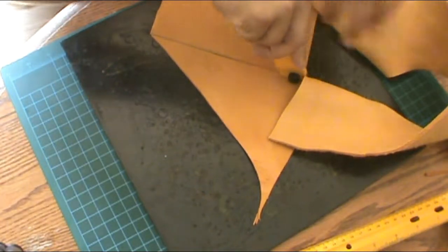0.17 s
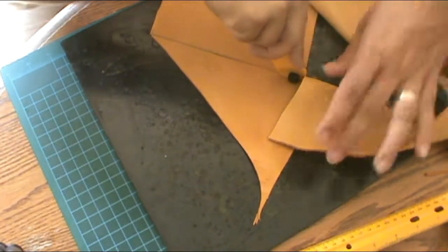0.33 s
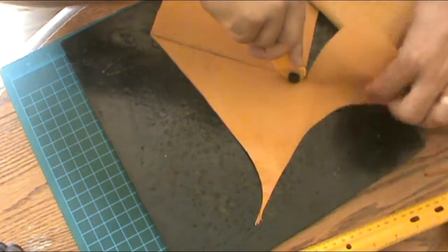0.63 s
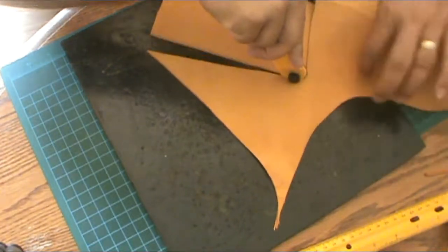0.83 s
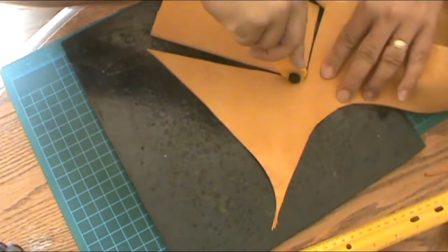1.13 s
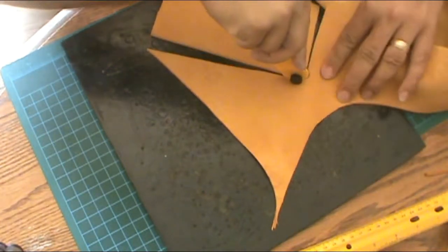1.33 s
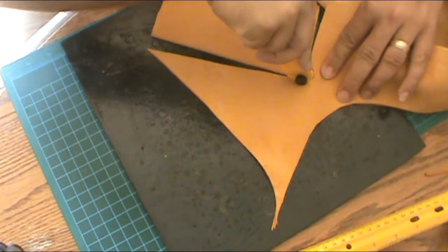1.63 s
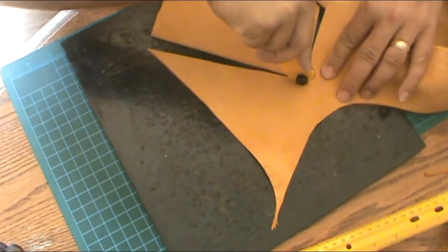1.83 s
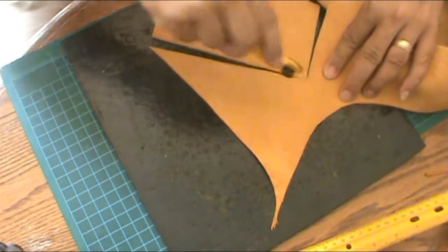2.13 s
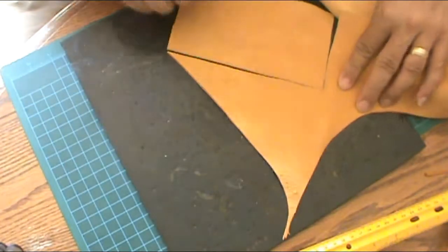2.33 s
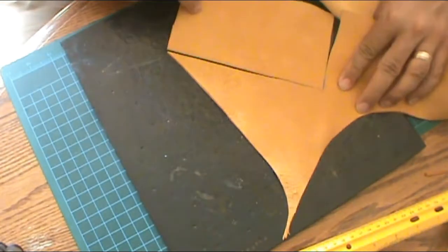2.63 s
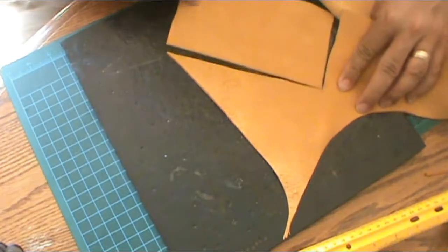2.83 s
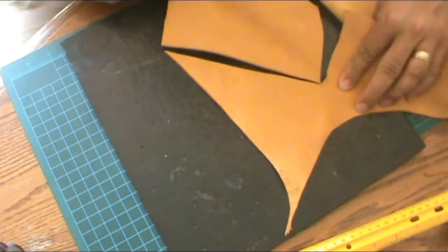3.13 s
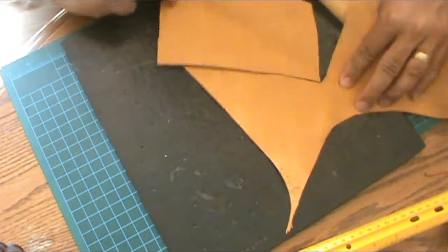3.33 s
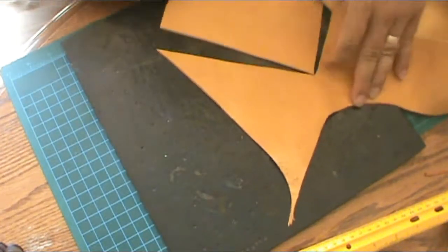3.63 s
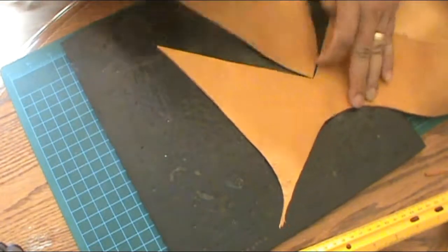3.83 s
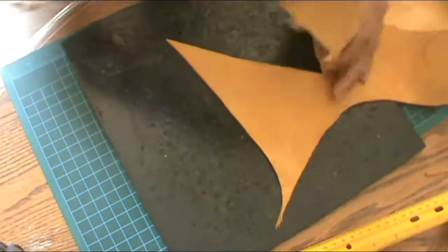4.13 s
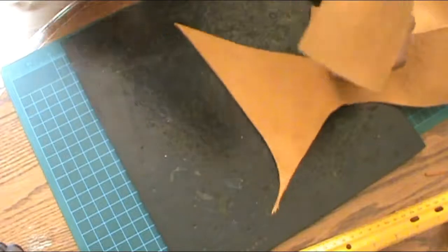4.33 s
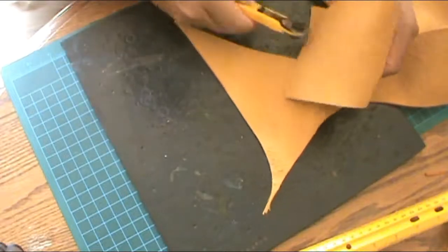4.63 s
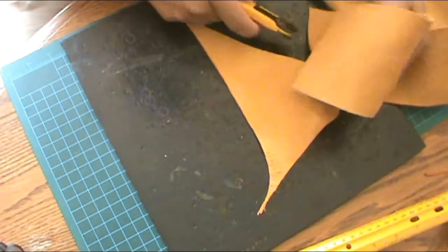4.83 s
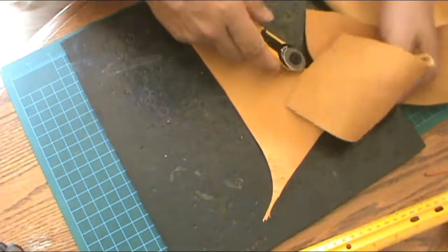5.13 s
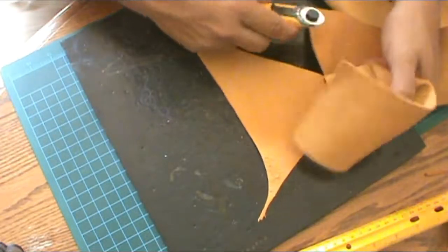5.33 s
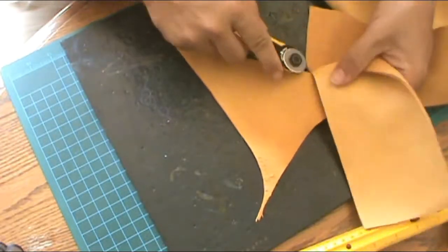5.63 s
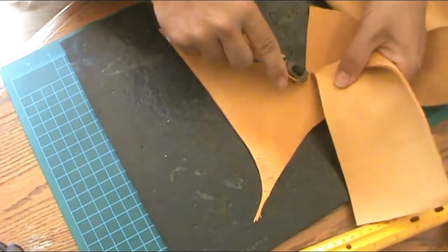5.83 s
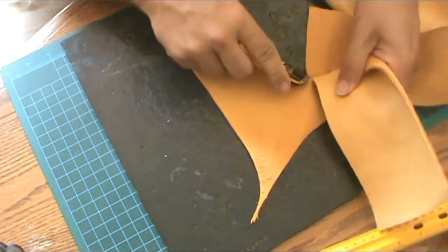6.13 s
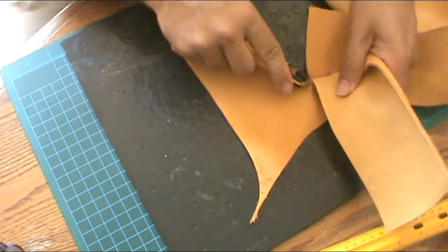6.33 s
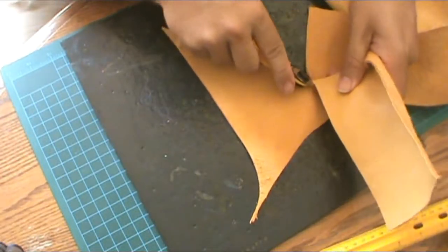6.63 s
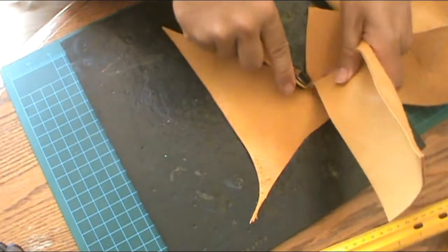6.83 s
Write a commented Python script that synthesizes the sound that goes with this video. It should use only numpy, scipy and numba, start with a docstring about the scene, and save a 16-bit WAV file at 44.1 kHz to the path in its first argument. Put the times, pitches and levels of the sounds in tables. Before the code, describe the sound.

A fan drones with a low, slightly throbbing hum throughout, in a small room. A faint crunch of a rotary cutter in leather comes at the start. From about 0.6 seconds the hide drags jerkily across a rubber board, running into a cluster of table thumps and a clack with a small steel clink between 0.8 and 1 second. Three soft, short cutting crunches follow from 1.3 to 1.7 seconds, then a few dry clicks around 2.1. At about 2.5 seconds the cutter scrapes lightly and knocks several times on the board. From 2.8 to 5.8 seconds the leather slides and rustles quietly under the hands in uneven strokes, with scattered small ticks. At 6 seconds the plastic blade guard snaps open, the loudest sound, with a brief steel ring and room echo. Only the fan remains until the end, near 7 seconds.

```python
"""In a small room where a fan drones, leather is cut with a rotary cutter on a rubber board.
The round blade crunches through the fibres, the hide grips and slips as it is shoved aside,
the cutter knocks on the table, and pieces slide and rustle under the hands.
At last the plastic blade guard snaps open, loud enough to ring the room."""
import sys
import numpy as np
from scipy import signal
from scipy.fft import rfft, irfft
from scipy.io import wavfile
from scipy.ndimage import uniform_filter1d
from numba import njit

SR = 44100
rng = np.random.default_rng(int(sys.argv[2]) if len(sys.argv) > 2 else 0)


def int16_out(signal):
    """Quantize to a 16-bit WAV file."""
    q = np.round(np.clip(np.atleast_2d(signal).T, -1, 1) * 32767)
    wavfile.write(sys.argv[1], SR, q.astype(np.int16))


N = 307377
T = np.arange(N) / SR
SIDES = np.array([[1], [-1]])  # plus on the left, minus on the right
TOP_HZ = 15750


def undb(db):
    """Turn decibels into a volume factor."""
    return 10 ** (np.asarray(db) / 20)


def unit(x):
    """Scale a signal to an average power of 1."""
    return x / np.sqrt(np.mean(x ** 2))


def on_log_axis(hz, points):
    """Read between (Hz, value) points, giving each octave equal space."""
    f, value = np.transpose(points)
    return np.interp(np.log(hz + 1), np.log(f), value)


def ring(x, response):
    """Make x ring like an object whose answer to one tap is `response`."""
    return signal.oaconvolve(x, response / np.linalg.norm(response))[:len(x)]


def colour(x, points):
    """Shape the tone along (Hz, dB) points; white noise keeps its power."""
    size = 8192
    hz = np.arange(size // 2 + 1) * SR / size + 1
    octaves_out = np.maximum(np.log2(points[0][0] / hz), 0) + np.maximum(np.log2(hz / points[-1][0]), 0)
    gain = undb(on_log_axis(hz, points) - 20 * np.minimum(octaves_out, 2))
    cepstrum = irfft(np.log(gain))
    cepstrum[1:size // 2] *= 2  # folded so that nothing sounds before its cause
    cepstrum[size // 2 + 1:] = 0
    return ring(x, irfft(np.exp(rfft(cepstrum))))


def modes(table):
    """A tapped object's few ringing tones; a fade time (t60) is the time to drop 60 dB."""
    t = T[:SR // 2]
    return sum(undb(db - 60 * t / t60) * np.sin(2 * np.pi * hz * t) for hz, db, t60 in table)


def crowd(t60, points):
    """A tapped object's many close tones, all dying quickly."""
    t = T[:SR // 4]
    fade = undb(-60 * t / t60)
    spectrum = rfft(rng.standard_normal(len(t)) * fade)
    even = irfft(spectrum / np.abs(spectrum), len(t))
    return colour(even * fade ** (1 / 4), points)


def blows(table, column):
    """One sharp tap per row, sized by a dB column."""
    x = np.zeros(N)
    for row in table:
        x[int(row[0] * SR)] += undb(row[column])
    return x


def struck(table, column, t60, points):
    """Every blow lands a little differently, so each gets its own mix of tones."""
    x = np.zeros(N + SR)
    for row in table:
        start, response = int(row[0] * SR), crowd(t60, points)
        x[start:start + len(response)] += undb(row[column]) * response / np.linalg.norm(response)
    return x[:N]


def curve(table):
    """Volume that follows (seconds, dB) points and fades beyond the ends."""
    times, db = np.transpose(table)
    outside = np.maximum(times[0] - T, 0) + np.maximum(T - times[-1], 0)
    return undb(np.interp(T, times, db)) * np.exp(-outside / 0.061)


def walk(rate):
    """A random wobble of size about 1 that turns `rate` times a second."""
    hold = int(SR / rate)
    steps = np.repeat(rng.standard_normal(N // hold + 1), hold)
    return unit(uniform_filter1d(steps, hold)[:N])


def slips(rate, spread_db):
    """Friction: about `rate` tiny random slips a second."""
    size = undb(spread_db * np.minimum(rng.standard_exponential(N), 4))
    return unit((rng.random(N) < rate / SR) * size * rng.choice([-1, 1], N))


@njit
def moving_band(x, hz, share):
    """Keep a band around a moving pitch; its width is a share of that pitch."""
    y, band, low = np.empty(len(x)), 0., 0.
    for i in range(len(x)):
        g = np.tan(np.pi * hz[i] / SR)
        v = (band + g * (x[i] - low)) / (1 + g * (g + share))
        band, low, y[i] = 2 * v - band, low + 2 * g * v, share * v
    return y


# The room's echo. Each row: pitch in Hz, base fade time in seconds.
ECHO_FADE = [(200, 0.4), (1000, 0.61), (4000, 0.47), (8000, 0.46), (14000, 0.34)]
# The echo's left-right difference. Each row: pitch in Hz, level in dB.
ECHO_WIDTH = [(200, -8), (600, 1), (1500, -3.5), (4400, -19), (8000, 2), (14000, 1.5)]
def room(x, wet_db, width, t60_scale):
    """The direct sound plus a wash of echo that lasts longest at middle pitches."""
    t = T[:SR * 3 // 4]
    hz = np.arange(len(t) // 2 + 1) * SR / len(t)
    noise, tail = rfft(rng.standard_normal((2, len(t)))), 0
    for band_hz, t60 in ECHO_FADE:
        share = on_log_axis(hz, [(f, f == band_hz) for f, _ in ECHO_FADE])
        tail = tail + irfft(noise * share, len(t)) * undb(-60 * t / (t60 * t60_scale))
    mid, side = tail * np.minimum(t / 0.0026, 1)
    return x + undb(wet_db) * (ring(x, mid) + width * SIDES * ring(x, colour(side, ECHO_WIDTH)))


# Late echoes. Each row: delay in seconds, smear in seconds, level in dB.
WALL_ECHOES = [(0.0535, 0.0062, -9.5), (0.092, 0.013, -16)]
# Their tone. Each row: pitch in Hz, level in dB.
WALL_TONE = [(300, 10), (750, 4), (1400, 2.5), (3000, 2), (6000, 1.5), (14000, -2.5)]
def far_walls(x):
    """The walls send the sound back late, dulled and scattered."""
    t, dulled = T[:SR // 6], colour(x, WALL_TONE)
    return sum(undb(db) * ring(dulled, rng.standard_normal(len(t)) * np.exp(-((t - delay) / smear) ** 2))
               for delay, smear, db in WALL_ECHOES)


# Microphone hiss and room air. Each row: pitch in Hz, level in dB.
MIC_TONE = [(300, -7), (2500, -0.5), (7500, -3), (11000, -1), (14000, -2.5), (16000, -2)]
ROOM_AIR_TONE = [(18, -66), (30, -28), (139, -20), (180, -6), (247, -13.5), (472, -6), (524, -11),
                 (794, -6), (859, -6.5), (1170, -11), (7830, -27), (15000, -39)]
def background():
    """Steady microphone hiss, and room air that differs between left and right."""
    hiss = undb(-61) * colour(rng.standard_normal(N), MIC_TONE)
    return hiss + undb(-56) * SIDES * colour(rng.standard_normal(N), ROOM_AIR_TONE)


# Air rumbling in the duct. Each row: pitch in Hz, width in Hz, level in dB.
DUCT_RUMBLE = [(146.9, 5, -53.5), (171.6, 17.6, -48), (186.4, 10, -51.5), (412.6, 39, -54.5)]
# Fan, motor and mains hum. Each row: pitch in Hz, level in dB, phase wobble in radians.
HUMS = [(118.4, -59, .2), (172.5, -42.5, 0.57), (187.8, -48, 0.68), (215, -63, 0.15), (237.4, -59, 0.53),
        (360.6, -62, .2), (531, -67.5, 0.16), (840.6, -65.5, 0.089), (1937, -78, 0.47)]
# Rushing air. Each row: pitch in Hz, level in dB.
RUSH_TONE = [(20, -14), (42, 0.5), (55, -3.5), (90, 2), (130, 0), (190, 9), (215, 0), (300, -2),
             (400, -7.5), (490, 0), (620, -6), (900, -10), (1500, -15), (2200, -27), (6000, -37.5)]
def fan():
    """Two close, unsteady tones throb over the duct's rumble, motor hum and rushing air."""
    hz = np.arange(N // 2 + 1) * SR / N
    peaks = sum(undb(db) * unit(1 / (1 + ((hz - f) / width) ** 2))
                * np.exp(2j * np.pi * rng.random(len(hz))) for f, width, db in DUCT_RUMBLE)
    rumble = irfft(peaks, N) * np.sqrt(N)
    hum = sum(undb(db + walk(5.8)) * np.sqrt(2) * np.sin(2 * np.pi * f * T + wobble * walk(4))
              for f, db, wobble in HUMS)
    air = colour(rng.standard_normal(N), RUSH_TONE) * undb(-50 + 0.28 * walk(13))
    return undb(-0.32) * rumble + undb(-2.17) * hum + air


# The cutter drags as it is set down. Each row: time in seconds, level in dB.
DRAG_LEVELS = [(2.33, -62), (2.42, -60.5), (2.6, -57), (2.72, -60), (2.85, -62)]
# Its tone. Each row: pitch in Hz, level in dB.
DRAG_TONE = [(1200, -19), (1500, 0), (1700, 3), (1950, -16), (2900, -15), (3330, -2), (3600, -13),
             (5000, -26)]
def cutter_drag():
    """Light rubbing on the board brings out two pitches of the cutter's handle."""
    return colour(slips(rate=1500, spread_db=0), DRAG_TONE) * curve(DRAG_LEVELS) * undb(-8)


def brush(peak_s, length_s, rise_share):
    """Speed of one sliding movement: it gathers, peaks and dies away."""
    roundness = 1.2  # 1 is pointed, 2 is bell-shaped
    rise = np.clip(rise_share, .1, .9)
    reach = length_s * np.where(T < peak_s, rise, 1 - rise)
    return np.exp(-np.minimum(np.abs(T - peak_s) / reach, 10) ** roundness)


# Hands and leather brushing. Each row: fastest moment and length in seconds, share spent
# speeding up, levels of hiss, rasp and edge in dB, edge pitch in Hz.
STROKES = [(0.064, 0.094, 0.3, -62, -64, -72, 10500), (0.48, 0.029, 0.66, -52.5, -55, -55, 9800),
           (0.585, 0.042, 0.2, -56, -66, -61, 10000), (0.666, 0.011, 0.7, -51, -49.5, -55, 10000),
           (0.766, 0.28, .6, -58, -55, -58, 10800), (1.077, 0.18, 0.77, -58, -61, -61, 10500),
           (2.325, 0.17, 0.67, -52, -57, -56, 11000), (2.602, 0.43, 0.66, -81, -62.5, -85, 5000),
           (2.788, 0.076, 0.88, -52, -58, -57, 10200), (2.872, 0.054, 0.1, -54, -54, -54, 9500),
           (3.06, 0.15, 0.32, -58.5, -61, -60, 10000), (3.217, 0.054, 0.5, -66, -58, -73, 5500),
           (3.335, 0.1, 0.45, -59, -61, -53, 9700), (3.387, 0.078, .5, -59, -61, -61, 10100),
           (3.528, 0.1, 0.66, -52, -54.5, -55, 10800), (3.58, 0.094, 0.34, -53.5, -59.5, -56, 6700),
           (3.69, 0.13, 0.57, -60, -59, -63, 5400), (3.775, 0.05, .6, -60, -65, -64, 10800),
           (3.872, 0.042, 0.9, -53.5, -58, -55, 5400), (3.995, 0.26, 0.56, -56, -57, -61, 5400),
           (4.196, 0.14, 0.42, -57.5, -61, -67, 10000), (4.305, 0.079, 0.67, -56, -58.5, -54, 5500),
           (4.41, 0.16, 0.33, -73, -59, -79, 4000), (4.636, 0.16, 0.4, -58.5, -55.5, -59, 10500),
           (4.937, 0.21, 0.64, -55.5, -58, -63, 10100), (5.14, 0.17, .6, -60.5, -62, -66, 9500),
           (5.343, 0.27, 0.66, -63, -63.5, -70, 10100), (5.57, 0.23, 0.62, -58, -59, -64, 11000),
           (5.746, 0.085, .6, -58.5, -66, -68, 10200)]
# The hiss and the rasp. Each row: pitch in Hz, level in dB.
HISS_TONE = [(3500, -17), (6000, -6), (7800, -8.5), (10000, -3.5), (11800, -7), (13500, -9), (16000, -29)]
RASP_TONE = [(500, -17), (1400, 1), (2400, -3), (3600, -4.5), (5500, -2), (7000, -10.5), (10000, -23)]
def rustle():
    """Fibres brush and catch: fine hiss, coarser rasp, and a bright band moving with each edge."""
    hiss_gain = rasp_gain = edge_gain = pitch_sum = weight = 0
    for peak_s, length, rise, hiss_db, rasp_db, edge_db, hz in STROKES:
        speed = brush(peak_s, length, rise)
        hiss_gain += undb(hiss_db) * speed
        rasp_gain += undb(rasp_db) * speed
        edge_gain += undb(edge_db) * speed
        pitch_sum += hz * speed ** 4  # the fastest stroke leads the pitch
        weight += speed ** 4
    edge_hz = np.clip(pitch_sum / weight * (1 + 0.056 * walk(25)), 1000, TOP_HZ)
    edge = moving_band(slips(rate=2500, spread_db=-0.5), edge_hz, share=0.37)
    edge = undb(-7) * unit(moving_band(edge, edge_hz, share=0.37))
    hiss = undb(-4) * colour(slips(rate=1600, spread_db=0.5), HISS_TONE)
    rasp = undb(-3.5) * colour(slips(rate=2000, spread_db=0.5), RASP_TONE)
    grip = undb(1.1 * walk(70) + 0.87 * walk(22.06))
    return grip * (hiss * hiss_gain + rasp * rasp_gain + edge * edge_gain)


# Fibres parting, cut edges flicking, fingernails.
# Each row: start in seconds, level in dB, strongest pitch in Hz.
SMALL_CLICKS = [(0.193, -34, 10500), (0.656, -34, 6500), (0.671, -35, 4200), (0.7227, -26, 8000),
                (2.0479, -24, 10300), (2.106, -25.5, 4230), (2.112, -26, 4230), (2.782, -26, 5600),
                (2.791, -27, 7800), (3.558, -28, 2500), (3.578, -28, 6800), (3.584, -28, 6800),
                (3.599, -32, 6800), (3.864, -28.5, 5500), (3.878, -33, 5200), (4.176, -28, 1700),
                (4.3883, -31, 3550), (4.936, -23, 7860), (4.9365, -28, 4620)]
def ticks():
    """Small dry clicks, each with one main pitch; soft leather rounds them off."""
    clicks = 0
    for start, db, hz in SMALL_CLICKS:
        tone = [(hz / 4, -16), (hz * 0.63, -10), (hz, 0), (hz * 1.25, -10), (hz * 8.8, -19)]
        clicks += struck([(start, db)], column=1, t60=0.015, points=tone)
    return signal.sosfilt(signal.butter(4, 11500, fs=SR, output="sos"), clicks)


# The hide dragging, and its underside grating on grit. Each row: time in seconds, level in dB.
SHOVE_LEVELS = [(0.56, -60), (0.605, -50.5), (0.65, -38), (0.70, -41), (0.745, -36), (0.79, -34.5),
                (0.83, -38.5), (0.865, -42), (0.895, -56), (0.95, -48)]
GRATE_LEVELS = [(0.62, -60), (0.67, -51), (0.705, -49), (0.735, -45.5), (0.79, -49.5), (0.83, -56),
                (0.86, -62)]
# Their tones. Each row: pitch in Hz, level in dB.
SHOVE_TONE = [(140, -14), (240, -4.5), (369, 1.5), (471, -3), (503, 0.5), (575, -6), (637, 2.5), (662, -1),
              (690, -1), (750, -8.5), (829, -15), (987, -8.5), (1540, -22.5), (1830, -23), (2400, -32),
              (6000, -53), (7800, -67), (13200, -120)]
GRATE_TONE = [(900, -15), (1400, -9), (1800, 3.5), (2150, -5), (2600, -10), (3500, -16), (6000, -26)]
def shove():
    """The hide sticks and slips on the rubber in uneven jerks, and the table top sounds with it."""
    jerks = undb(0.5 * walk(69.3))
    drag = unit(colour(slips(rate=900, spread_db=1) * jerks, SHOVE_TONE))
    grate = unit(colour(slips(rate=500, spread_db=3) * jerks, GRATE_TONE))
    return undb(-1) * drag * curve(SHOVE_LEVELS) + undb(-7) * grate * curve(GRATE_LEVELS)


# Pushes of the blade. Each row: middle and length in seconds, dull and crisp levels in dB.
PUSHES = [(0.208, 0.3, -61, -88), (1.333, 0.046, -56, -57.5), (1.492, 0.097, -51.5, -57.5),
          (1.648, 0.041, -53, -58.5), (2.4, 0.29, -55.5, -65.5)]
# The dull and the crisp crunch. Each row: pitch in Hz, level in dB.
DULL_TONE = [(250, 4), (450, 21.5), (950, 5), (1300, 1), (1750, 13.5), (2400, -13), (5000, -19)]
CRISP_TONE = [(1500, 6), (2200, 3.5), (2750, 0.5), (3600, -6), (5000, -3.5), (7000, -17), (11000, -16)]
def cuts():
    """Each push of the round blade crunches through the fibres and into the board."""
    fibres = slips(rate=3800, spread_db=5.5)
    dull, crisp = colour(fibres, DULL_TONE), colour(fibres, CRISP_TONE)
    return sum(np.exp(-(2 * (T - middle) / length) ** 2) * (undb(dull_db) * dull + undb(crisp_db) * crisp)
               for middle, length, dull_db, crisp_db in PUSHES)


# Blows on the board. Each row: start in seconds, levels of boom, thud, clack and blade ring in dB.
BOARD_HITS = [(0.792, -4.5, -18, -40, -55), (0.807, -7, -11, -36, -55), (0.821, -12, -9, -38, -55),
              (0.85, -22, -18, -38, -55), (0.857, -18, -15, -38, -55), (0.9645, -9, -15, -9.5, -17),
              (0.9715, -8, -15.5, -15, -24), (0.979, -13, -31, -27, -40), (0.987, -17, -18, -31, -49),
              (1.005, -16, -14, -42, -55), (2.11, -50, -32, -22, -46), (2.534, -19, -16, -10.5, -36),
              (2.547, -13, -12.5, -17, -33), (2.555, -15, -11, -21, -40), (2.568, -34, -16, -28, -48),
              (2.582, -27, -13, -28, -44), (2.782, -47, -22, -16, -46)]
# Table, board and cutter. Each row: pitch in Hz, level in dB.
BOOM_TONE = [(140, -12.5), (230, -13), (310, 1.5), (400, -2), (700, -32)]
THUD_TONE = [(130, -6), (240, 0), (350, 1.5), (450, -2.5), (640, -2), (850, -8), (1060, -8), (1600, -21.5),
             (4000, -58)]
CLACK_TONE = [(300, 28.5), (800, 5), (1500, 11), (2400, 6.5), (3500, -3), (5000, -6), (8000, -32),
              (15000, -24)]
def knocks():
    """The table top booms, the rubber board gives a short thud and the cutter clacks."""
    boom = struck(BOARD_HITS, column=1, t60=0.055, points=BOOM_TONE)
    thud = struck(BOARD_HITS, column=2, t60=0.035, points=THUD_TONE)
    clack = struck(BOARD_HITS, column=3, t60=0.016, points=CLACK_TONE)
    return boom + thud + undb(-2) * clack


# The blade and the cutter's body. Each row: pitch in Hz, level in dB, fade time in seconds.
DISC_RING = [(3450, -1, 0.022), (3520, 19, 0.047), (3640, -3, 0.022), (3850, -7, 0.02), (4480, -3, 0.027)]
BODY_RING = [(1090, 8, 0.22), (1320, -3, 0.33), (1700, -9, 0.48), (1800, -12, .3), (3240, -6, .25),
             (3340, 0, .3)]
def blade():
    """A knock makes the steel disc clink, and the cutter's body ring more faintly and for longer."""
    disc = ring(blows(BOARD_HITS, column=4), modes(DISC_RING))
    body = ring(blows(BOARD_HITS, column=3), modes(BODY_RING))
    return undb(-1.5) * disc + undb(-28) * body


# The guard catches on its latch. Each row: start in seconds, level in dB.
CATCH_HITS = [(6.0, -21), (6.011, -25)]
# It lets go, hits its stop and bounces. Each row: start in seconds, latch and handle levels in dB.
SNAP_HITS = [(6.0248, 4, -27), (6.0268, 5.5, -17), (6.0305, -3, -12), (6.0333, -2, 1.5), (6.036, -2, -5.5),
             (6.0483, -1.5, -29)]
# Sliding guard, latch and handle. Each row: pitch in Hz, level in dB.
SLIDE_TONE = [(800, -7), (1600, -3), (2800, -4), (3800, -2), (4500, -10), (5400, -6), (7500, -14),
              (13000, -23), (15500, -30)]
LATCH_TONE = [(500, -22), (900, -3), (1900, -8), (2500, -6), (3000, 1), (3400, 5), (3700, 0.5), (4000, 0),
              (4400, -2), (5150, 3), (5350, -4), (5620, 6.5), (6200, -4), (6800, -6), (7500, -7.5),
              (7900, -7), (8900, -5), (9600, -2), (10400, 3), (10800, 0), (11200, -4), (12500, -4),
              (13700, -8), (14300, -5), (16000, -23)]
HANDLE_TONE = [(420, -29.5), (630, -15), (850, -12.5), (1050, -15), (1280, -2.5), (1400, -4), (1540, 2),
               (1740, -0.5), (1950, -13.5), (2600, -16), (3500, -32)]
# The catch and the handle ringing. Each row: pitch in Hz, level in dB, fade time in seconds.
CATCH_RING = [(3720, -5, .04), (3870, 6, .035), (5200, -3, 0.063), (6740, -7, 0.027), (10500, -6, .02)]
HANDLE_RING = [(1300, -6, .014), (1530, 2, 0.012), (1720, 3, 0.012)]
def guard():
    """The guard catches and slides, the latch cracks, and the stop knocks on the hollow handle."""
    swell_db_per_s, stop_s = 448, 0.0089  # pressure grows until the latch lets go
    since = T - SNAP_HITS[0][0]
    push = undb(-40 + swell_db_per_s * np.minimum(since, 0)) * np.exp(-np.maximum(since, 0) / stop_s)
    slide = push * colour(slips(rate=1900, spread_db=2.5), SLIDE_TONE)
    contact = undb(-18) * colour(blows(SNAP_HITS, column=1), LATCH_TONE)
    crack = struck(SNAP_HITS, column=1, t60=0.064, points=LATCH_TONE)
    shell = undb(1) * struck(SNAP_HITS, column=2, t60=0.03, points=HANDLE_TONE)
    hollow = undb(-11.5) * ring(blows(SNAP_HITS, column=2), modes(HANDLE_RING))
    catch = ring(blows(CATCH_HITS, column=1), modes(CATCH_RING))
    return catch + slide + contact + crack + shell + hollow


# The cutter's steel parts. Each row: pitch in Hz, level in dB, fade time in seconds.
STEEL_RING = [(3200, 2, 0.26), (3480, -5, 0.22), (3910, -7, 0.26), (3946, -6, .26), (5230, -9, 0.22),
              (5600, -2, 0.24), (5400, -6, .22), (5873, -1, 0.24), (9700, -5, .18), (10450, -3, .16),
              (11400, 12, .18), (11900, -5, .16)]
def steel_ring():
    """The steel goes on ringing after the latch lets go."""
    return undb(-7) * ring(blows(SNAP_HITS[:1], column=1), modes(STEEL_RING))


def scene():
    """All the work shares one room; table sounds sit a little to the right."""
    table = room(shove() + knocks() + cuts(), wet_db=-1, width=0.31, t60_scale=0.77) * undb(-1.4 * SIDES)
    hands = room(rustle() + cutter_drag(), wet_db=-4.5, width=0.28, t60_scale=0.63)
    clicks = room(ticks() + blade(), wet_db=-8, width=0.4, t60_scale=0.87)
    snap = guard()
    snap = room(snap, wet_db=-5.5, width=0.43, t60_scale=0.94) + far_walls(snap) + steel_ring()
    return table + hands + clicks + snap + fan() + background()


# How much the two microphones differ. Each row: pitch in Hz, level in dB.
MIC_DIFFERENCE = [(1400, -10), (2500, 0), (4400, -34), (6500, -11), (8000, -14), (11000, -4), (15000, -11)]
def record(dry):
    """The two microphones differ slightly, most in the treble; the very top is cut off."""
    difference = ring(dry.mean(axis=0), crowd(.02, MIC_DIFFERENCE))
    top_cut = signal.ellip(10, .2, 70, TOP_HZ, fs=SR, output="sos")
    return signal.sosfilt(top_cut, dry + undb(-19) * SIDES * difference)


dry = scene()
out = record(dry)
int16_out(out)
```